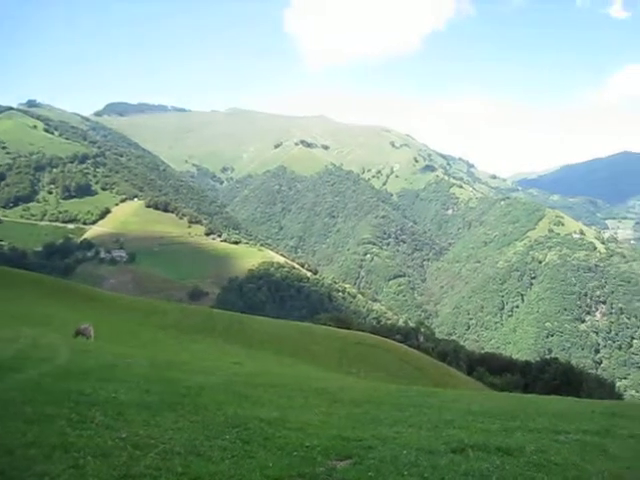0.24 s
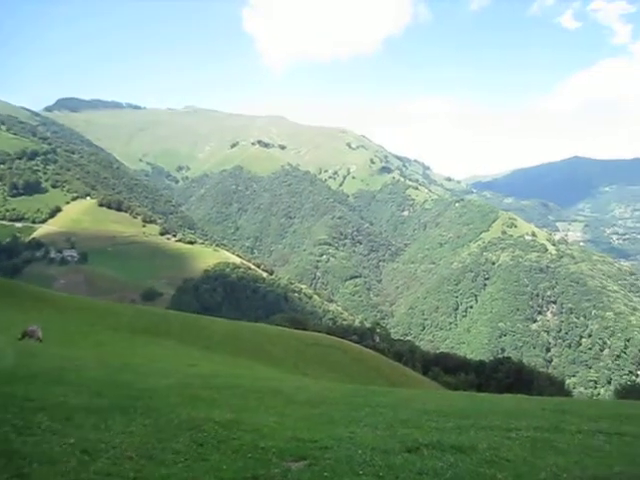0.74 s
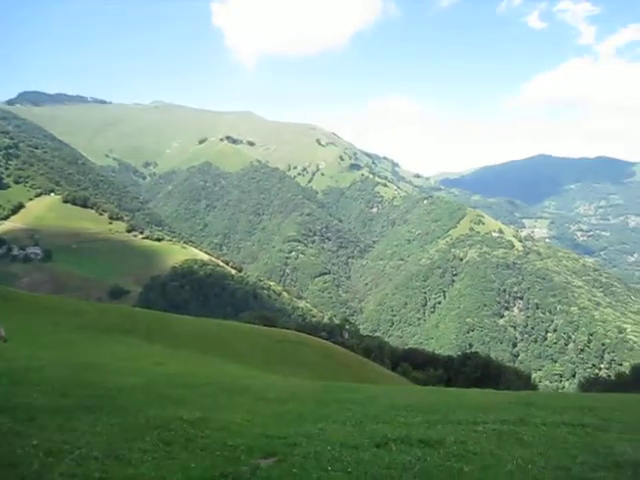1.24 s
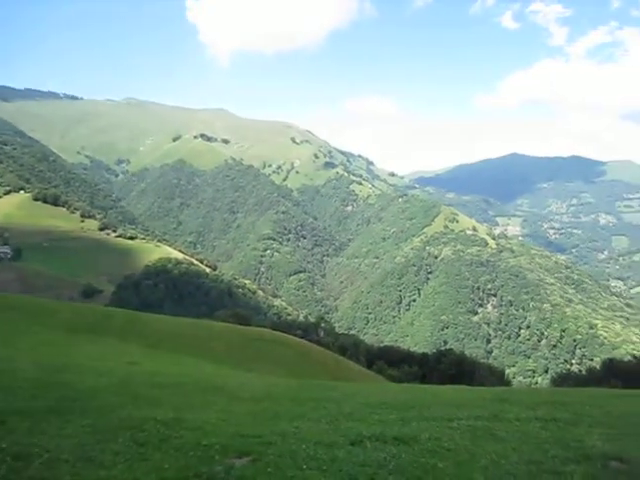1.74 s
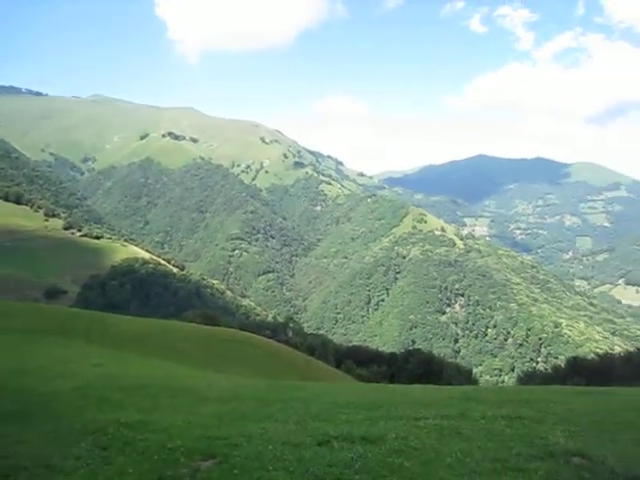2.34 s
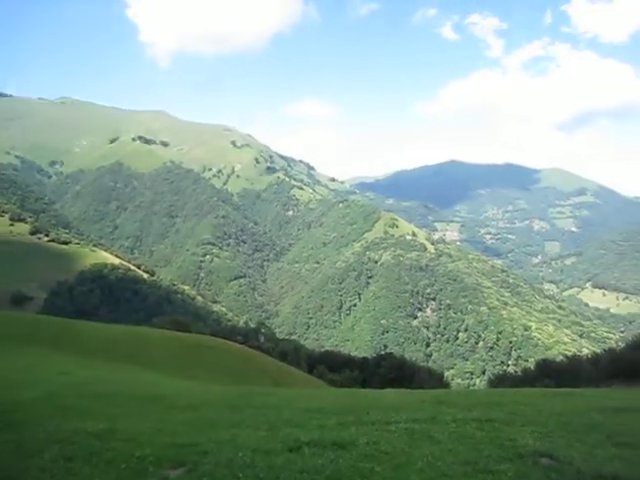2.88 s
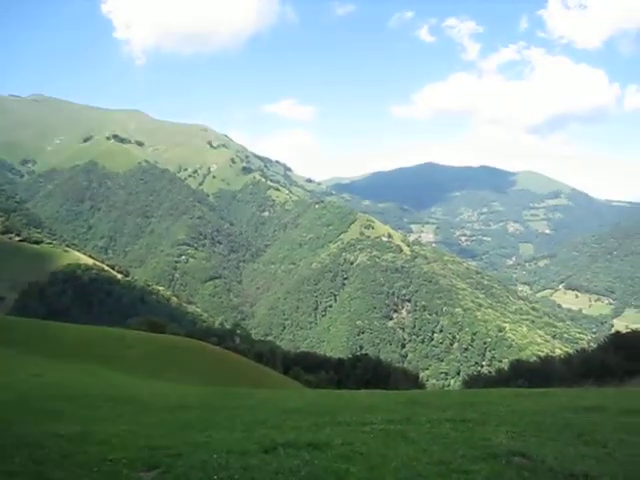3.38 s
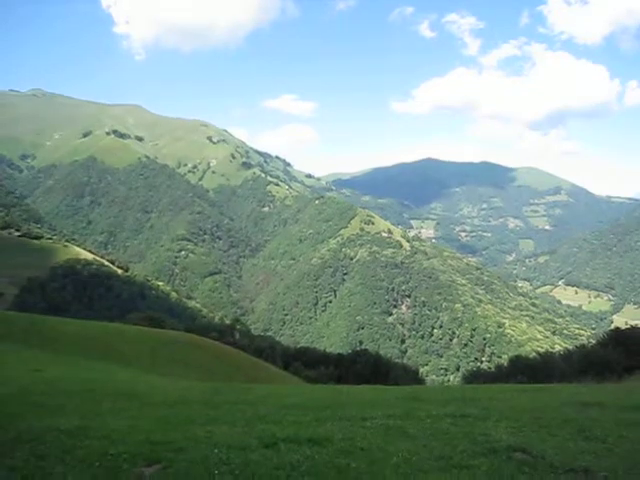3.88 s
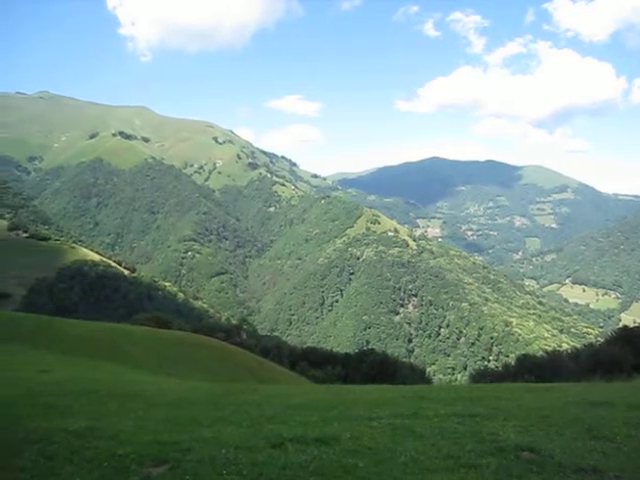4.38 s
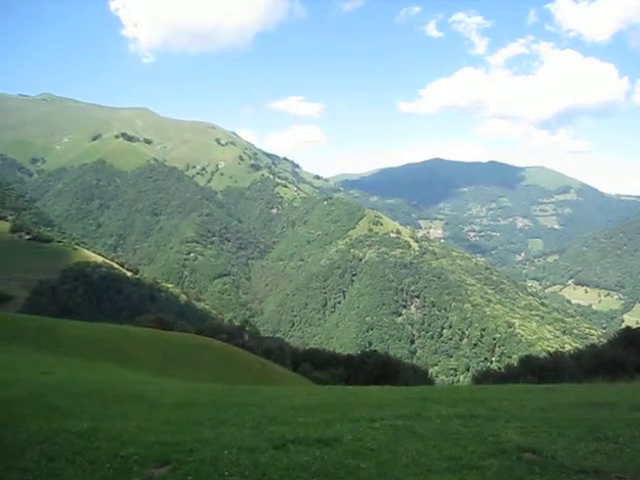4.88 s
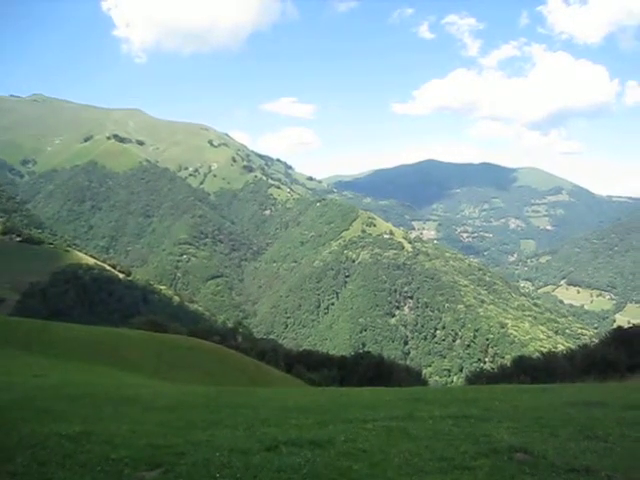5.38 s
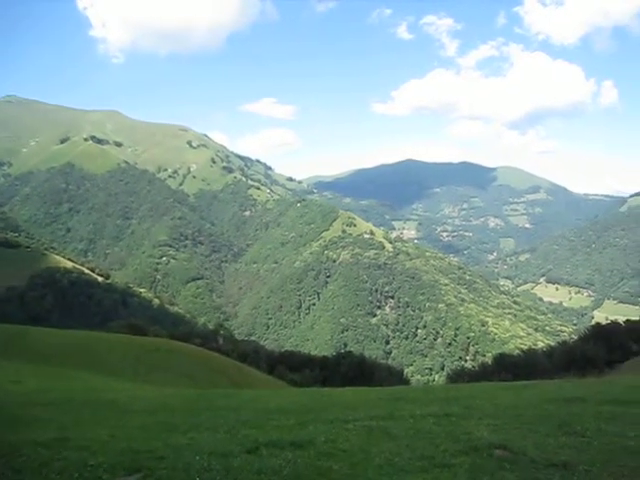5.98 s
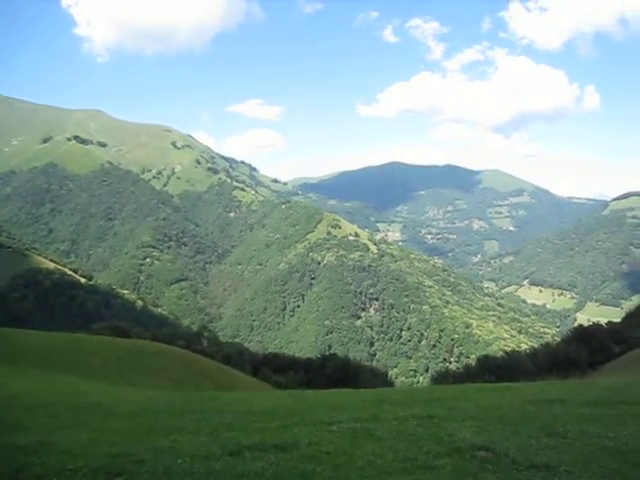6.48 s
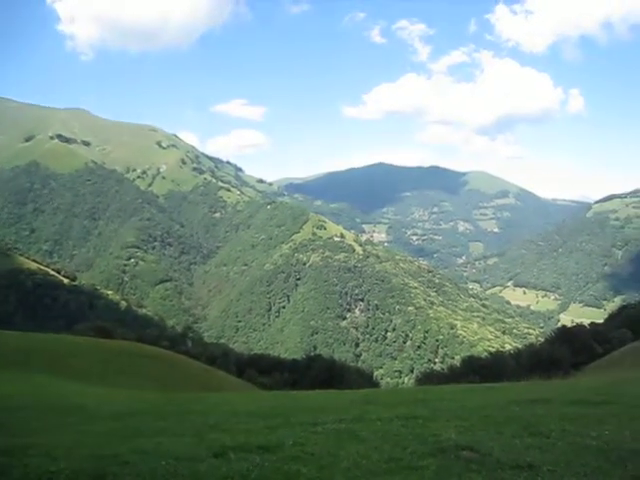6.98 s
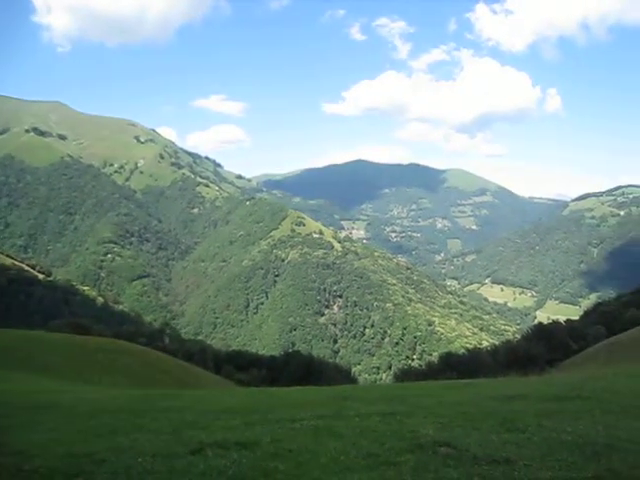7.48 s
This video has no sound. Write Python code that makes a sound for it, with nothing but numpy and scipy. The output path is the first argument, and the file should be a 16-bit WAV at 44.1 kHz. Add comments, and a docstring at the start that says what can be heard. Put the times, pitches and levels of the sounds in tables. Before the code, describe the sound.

An open mountain pasture with faint steady hiss and low lumpy wind rumble. From 0 s several cowbells ring irregularly: a thin bright bell around 2 to 4 kHz whose high partial sings, swells and wavers, a busier dry clanking bell, and a sparser tinny one. The first second is dense and loud, with a wind buffet near 0.9 s; the bells thin out and soften from 1.2 to 3.4 s. A hollow wooden knock with a short rattle lands at 3.6 s. Tiny descending bird chirps begin around 4 s. From 4.6 to 5.2 s a strong gust flutters and pops hard against the microphone. Bright ringing returns from 5.4 to 6.3 s, with high bird trills at 5.15 and 5.8 s and another gust at 6 s. The lowest bell clonks strongly at 6.3, 6.7 and 7.1 s, with a dry scuff at 6.6 s. Bells and light wind pops continue to the end, around 7.7 s, with only a short diffuse echo.

```python
"""Four sheet-metal cowbells clank at their own pitches on an open mountain slope: each blow rings sine modes anew.
The bright bell's strongest partial sings on, swelling and sinking as the bell turns; a wooden knock is damped
sines with a noisy rattle, a scuff is fading noise, and a diffuse noise tail echoes them and the bell blows.
Two small birds trill in gliding sines; gusts buffet and pop the microphone with noise and pressure bumps;
the meadow hisses faintly as coloured noise."""
import sys
import numpy as np
from scipy import signal
from scipy.fft import rfft, irfft, next_fast_len
from scipy.io import wavfile
from scipy.ndimage import uniform_filter1d, map_coordinates

SR = 44100
rng = np.random.default_rng(int(sys.argv[2]) if len(sys.argv) > 2 else 0)


def digitize_waveform(pressure):
    """Quantize a signal to 16-bit integers and store it at the path in sys.argv[1].

    Rows of a 2-D input are taken as channels; values are limited to [-1, 1].
    """
    field = np.atleast_2d(pressure).T
    bounded = np.clip(field, -1, 1)
    quanta = np.round(bounded * 32767).astype(np.int16)
    wavfile.write(sys.argv[1], SR, quanta)


N = 340893


def amp(db):
    """Turn decibels into a linear factor."""
    return 10 ** (np.asarray(db) / 20)


def unit(x):
    """Scale a signal to an rms of 1."""
    return x / np.sqrt(np.mean(x ** 2) + 1e-20)


def wobble(rate):
    """A smooth random curve with rate knots a second."""
    knots = rng.standard_normal(int(N * rate / SR) + 4)
    return map_coordinates(knots, [np.arange(N) * rate / SR])


def filtered(x, response):
    """Multiply the spectrum of x by a complex response of frequency."""
    m = next_fast_len(N + SR // 2)
    return irfft(rfft(x, m) * response(np.fft.rfftfreq(m, 1 / SR)), m)[..., :N]


def coloured(spectrum):
    """Noise of rms 1 shaped by rows of frequency in Hz and relative density in dB."""
    f, db = np.transpose(spectrum)

    def response(hz):
        return amp(np.interp(np.log(hz + 1), np.log(f + 1), db, right=-120))

    return unit(filtered(rng.standard_normal(N), response))


def bell(families, voicing, blows, crack_db):
    """The clapper stops the old ringing and starts each mode family anew; the contact itself cracks."""
    sway_depth_db = 1.6
    scatter_depth_db = 4.5  # how far one blow favours a mode over the first of its family
    blows, voicing = np.array(blows), np.array(voicing)
    strength_db, landing = blows[:, 1:2], blows[:, 2:]
    levels = strength_db + voicing[:, 0] + landing @ voicing[:, 1:].T  # one row a blow, one column a family

    t = np.arange(N) / SR
    last = np.searchsorted(blows[:, 0], t, side="right") - 1
    since = np.where(last >= 0, t - blows[last, 0], N)  # a huge age keeps the bell silent before its first blow
    contact = coloured([(600, -44), (2500, 0.0), (7000, -7), (16000, -20)])
    out = amp(levels[last, -1] + crack_db - 60 * since / .025) * contact

    # a thicket of weak high modes joins the top family
    thicket = [(hz, -hz / 600) for hz in 6500 + 8000 * rng.random(size=20) ** 2.0]
    top_t60, top_modes = families[-1]
    families = families[:-1] + [(top_t60, top_modes + thicket)]
    for k, (t60, modes) in enumerate(families):
        first_hz = modes[0][0]
        # each family flickers as the neck turns the bell, the damped ones with more of the fast flicker
        sway_db = sway_depth_db * (wobble(9) + wobble(45) * np.minimum(.5 / t60, 2))
        for hz, db in modes:
            chance = rng.standard_normal(size=(len(blows), 2))
            # modes far from the family's first vary more from blow to blow
            spread_db = 2.0 + scatter_depth_db * (hz != first_hz) + 7 * abs(np.log(hz / first_hz))
            scatter_db = spread_db * np.tanh(chance[last, 0])
            fade_db = -60 * since / t60 * hz / first_hz  # higher modes die sooner
            level_db = levels[last, k] + db + scatter_db + fade_db + sway_db
            size = uniform_filter1d(amp(level_db), size=24)
            out += size * np.sin(2 * np.pi * hz * since + 10 * chance[last, 1])
    return out


def bright_bell():
    """A thin, long-ringing bell whose lightly damped modes shine high up."""
    # Mode families that one blow excites together. Each row: t60 of the first mode in seconds,
    # then its modes as pairs of frequency in Hz and relative level in dB.
    mode_families = [(4, [(2116, 0)]), (2.4, [(4166, 2), (4157, -11)]), (1.19, [(4861, 2), (4791, -3),
                     (4823, -2)]), (1.1, [(6731, 2)]), (1.2, [(5998, 0)]), (0.4, [(8920, 11), (9695, 2),
                     (10191, -4), (10444, 5), (11396, 3), (11900, -3), (12166, -2), (14150, -7)])]
    # How each family answers a blow. Each row: gain over the blow's strength in dB,
    # tilt in dB per unit of landing height, tilt in dB per unit of landing side.
    family_voicing = [(-4, -5.5, 8.5), (9, -1, -7), (5.5, -3, -2), (4, -7.5, -4.5), (0.6, 15.5, 0),
                      (-8.5, -3.3, -2)]
    # Clapper blows. Each row: start in seconds, strength in dB before the voicing,
    # landing height on the wall and landing side (no unit, roughly -1 to 1).
    clapper_blows = [(0, -48, -0.13, 0.031), (0.088, -41.5, 0.068, 0.36), (0.364, -41.5, 0.17, -0.36),
                     (0.434, -44, 0.16, -0.23), (0.817, -51.5, -0.73, -0.14), (1.263, -50, -0.65, 0.46),
                     (1.579, -52, -0.39, -0.42), (1.73, -44, -1.1, 0.39), (2.171, -46.5, -0.76, 0.26),
                     (2.598, -53.5, -0.37, 0.24), (2.817, -48, 0.13, 0.04), (2.868, -46, 0.2, -0.3),
                     (3.036, -50, 0.45, -1.24), (3.237, -52, 0.14, 0.12), (3.651, -52.5, -0.21, -0.012),
                     (4.019, -47.5, -0.023, -0.1), (4.185, -47.5, 0.12, -0.16), (4.35, -46.5, 0.31, -0.78),
                     (4.505, -48, 0.13, 0.32), (4.668, -55, -0.29, 0.58), (5.176, -48.5, -0.092, 0.72),
                     (5.378, -54, 0.27, -0.28), (5.571, -44, 0.064, 0.3), (5.707, -42, -0.16, 0.45),
                     (5.993, -44.5, 0.23, 0.83), (6.121, -44, 0.05, 1), (6.26, -47, -0.19, 0.55),
                     (6.541, -54, 0.15, -0.59), (7.318, -52.5, 0.19, 1.0), (7.714, -48.0, 0.41, 0.64)]
    return bell(mode_families, family_voicing, clapper_blows, crack_db=19)


def clanking_bell():
    """A busy bell with a lower, more heavily damped body that clanks."""
    # Each row: t60 of the family's first mode in seconds, pairs of frequency in Hz and relative level in dB.
    mode_families = [(0.18, [(964, -3), (991, -2)]), (0.51, [(2519, 10), (2590, -1)]),
                     (0.55, [(4243, 5.8)]), (0.87, [(4080, 6.5), (2096, -4.5)]), (0.17, [(7190, 7),
                     (5844, -1), (8650, 1), (9240, 0.5), (9860, -1.5)])]
    # Each row: family gain in dB, tilt in dB per unit of landing height, tilt in dB per unit of landing side.
    family_voicing = [(8, -8, 5.5), (-1, 6, -1.5), (-2, 12.5, -2.5), (-1.0, -6, -8.5), (0, 1.5, 4)]
    # Each row: start in seconds, strength in dB before the voicing, landing height and side (no unit).
    clapper_blows = [(0.163, -48.5, -0.52, 0.12), (0.431, -40, -0.23, -0.052), (0.472, -41.5, 0.48, -1.1),
                     (0.502, -46, 0.93, 0.044), (0.723, -46, 0.49, -0.096), (0.926, -48.5, -0.07, 0.045),
                     (1.026, -50.4, -0.12, -0.56), (1.221, -50.5, 0.26, -0.7), (1.49, -56.5, 0.23, -0.09),
                     (1.732, -51.5, 0.23, -0.16), (1.825, -50.9, 0.34, -0.03),
                     (1.927, -53.5, -0.16, -0.035), (2.575, -49, -0.15, 0.41), (2.888, -52.5, -0.71, 0.4),
                     (3.04, -52.5, -0.041, 0.05), (3.157, -53, -0.6, -0.65), (3.534, -45, 0.16, 0.24),
                     (3.78, -56, 0.012, 0.82), (3.874, -45, 0.84, -0.51), (4.217, -46.5, 0.28, 0.27),
                     (4.26, -51, 0.16, 0.37), (4.627, -44.5, -0.056, 0.98), (4.999, -41, 0.55, 1.0),
                     (5.069, -47.5, -0.15, -0.053), (5.287, -56.5, -0.037, -0.4),
                     (5.379, -48.5, 0.34, 0.55), (5.458, -46.5, 0.63, 0.066), (5.788, -47.5, -0.092, -0.33),
                     (6.612, -46.5, -0.28, 0.46), (6.92, -48, 0.076, -0.22), (7.003, -52, 0.2, -0.68),
                     (7.235, -42, -0.38, -0.5), (7.414, -50.4, 0.44, -0.29), (7.677, -46, -0.15, 0.22)]
    return bell(mode_families, family_voicing, clapper_blows, crack_db=5.2)


def tin_bell():
    """A sparser, tinny bell with two families of damped modes."""
    # Each row: t60 of the family's first mode in seconds, pairs of frequency in Hz and relative level in dB.
    mode_families = [(.2, [(1040, 0)]), (.55, [(2665, 6), (3801, -1.5), (5184, 1.5), (5475, -7.5)])]
    # Each row: family gain in dB, tilt in dB per unit of landing height.
    family_voicing = [(3.5, -2), (0, 7)]
    # Each row: start in seconds, strength in dB before the voicing, landing height (no unit).
    clapper_blows = [(0.313, -34, -0.21), (1.094, -36, -1.56), (1.55, -57, 0.5), (2.279, -48.5, 0.64),
                     (2.721, -52, 0.62), (3.441, -41.5, -0.33), (4.125, -39.5, -0.43), (4.936, -45, 0.15),
                     (5.721, -49.5, 0.13), (6.125, -47.5, 0.17), (7.359, -49.5, -0.17)]
    return bell(mode_families, family_voicing, clapper_blows, crack_db=0.1)


def deep_bell():
    """The lowest bell, struck only a few times."""
    # Each row: t60 of the family's first mode in seconds, pairs of frequency in Hz and relative level in dB.
    mode_families = [(0.32, [(727, 0)]), (1.1, [(1830, 4), (2690, -3), (3903, -11)]), (0.18, [(5523, -3),
                     (8053, -2), (8667, -4)])]
    # Each row: family gain in dB, tilt in dB per unit of landing height.
    family_voicing = [(2.5, -19), (-9, 1), (-7, -36)]
    # Each row: start in seconds, strength in dB before the voicing, landing height (no unit).
    clapper_blows = [(0.277, -41, -0.0014), (2.19, -40, 1), (6.278, -31.5, -0.03), (6.721, -31, 0.045),
                     (7.069, -27.5, -0.023)]
    return bell(mode_families, family_voicing, clapper_blows, crack_db=10.0)


def singing_partial():
    """The turning bright bell sweeps its lobes past the microphone, each fading after its crest; the pitch wavers."""
    # Lobes of the singing partial. Each row: quietest moment in seconds, loudest moment in seconds,
    # rms level at the crest in dB.
    swing_lobes = [(-0.3, 0.167, -34), (0.335, 0.676, -29), (0.84, 0.84, -37), (1.13, 1.36, -40),
                   (1.712, 2.27, -40), (2.8, 2.826, -40.5), (2.875, 3.036, -40), (3.226, 3.26, -38.5),
                   (3.547, 3.674, -43.5), (4.01, 4.03, -44), (4.175, 4.2, -46.5), (4.34, 4.358, -42.5),
                   (4.516, 4.575, -49), (4.606, 4.705, -43.5), (4.95, 5.26, -51.5), (5.386, 5.437, -34),
                   (5.445, 5.501, -36.5), (5.568, 5.666, -33), (5.762, 5.812, -33.5), (5.85, 6.012, -28.5),
                   (6.177, 6.252, -39.5), (6.274, 6.342, -37), (6.416, 6.478, -43), (6.535, 6.577, -33),
                   (6.667, 6.77, -40), (6.837, 6.91, -41.5), (7.036, 7.097, -35.5), (7.13, 7.238, -36),
                   (7.657, 7.7, -45.5)]
    singing_hz, fade_db_per_s = 3351.4, 20
    lobe_sharpness, null_db, last_null_s = 0.72, -17, 8.5
    silent, loudest, db = np.transpose(swing_lobes)
    t = np.arange(N) / SR

    # nulls and crests alternate, a quarter turn of the sine apart
    marks = np.append(np.column_stack([silent, loudest]).ravel(), last_null_s)
    lobe = np.sin(np.pi / 2 * np.interp(t, marks, np.arange(len(marks))))
    facing = np.sign(lobe) * np.abs(lobe) ** lobe_sharpness

    now = np.searchsorted(silent, t) - 1
    fade_db = fade_db_per_s * np.maximum(t - loudest[now], 0)
    level_db = uniform_filter1d(db[now] - fade_db, size=400)
    phase = 2 * np.pi * np.cumsum(singing_hz * (1 + 0.00081 * wobble(4.3))) / SR
    # a weak quadrature part keeps the nulls from full silence
    tone = facing * np.sin(phase) + amp(null_db) * np.cos(phase)
    return np.sqrt(2) * amp(level_db) * tone


def knock():
    """A hollow wooden blow: heavily damped modes with a short noisy rattle after it."""
    # Modes of the wood. Each row: frequency in Hz, relative level in dB, t60 in seconds.
    wood_modes = [(535, 3, 0.11), (1213, -7, 0.12), (1720, -7, 0.04)]
    start_s, level_db = 3.644, -19
    t = np.arange(SR // 2) / SR
    ring = sum(amp(db - 60 * t / t60) * np.sin(2 * np.pi * hz * t) for hz, db, t60 in wood_modes)
    grain = coloured([(300, -9), (600, -2.0), (1500, -10), (3000, -15), (4000, -46)])[:len(t)]
    rattle = grain * amp(-6.0 - 60 * t / 0.27)
    attack = 1 - np.exp(-t / 0.0015)
    out = np.zeros(N)
    out[round(start_s * SR):][:len(t)] = amp(level_db) * (ring + rattle) * attack
    return out


def scuff():
    """A short dry scuff, perhaps a hoof in the grass: noise that starts at once and fades."""
    start_s, onset_db, t60_s = 6.6, -36.5, 0.41
    since = np.arange(N) / SR - start_s
    fade = amp(onset_db - 60 * np.abs(since) / t60_s) * (since > 0)
    return fade * coloured([(500, -8.0), (2000, -9), (9000, -25)])


def slope_echo(x):
    """A short diffuse return from the ground and the herd: a decaying noise tail of unit energy."""
    t = np.arange(SR // 2) / SR
    tail = rng.standard_normal(len(t)) * amp(-60 * t / 0.14)
    return signal.fftconvolve(x, tail / np.linalg.norm(tail))[:N]


def flicking_bird():
    """A held note flicks upward about 30 times a second, dipping in level at each flick."""
    # Held notes. Each row: start in seconds, end in seconds, peak level between flicks in dB.
    held_notes = [(5.148, 5.214, -39), (5.785, 6.017, -39)]
    flick_period_s, note_hz, flick_hz, flick_dip_db = .0335, 6320, 170, 3.6
    t = np.arange(N) / SR
    out = np.zeros(N)
    for start, end, db in held_notes:
        beat = ((t - start) / flick_period_s) % 1
        gate = uniform_filter1d(1. * ((t > start) & (t < end)), size=200)
        flick = np.exp(-((beat - .93) / 0.18) ** 2)
        phase = 2 * np.pi * np.cumsum(note_hz + flick_hz * flick) / SR
        out += gate * amp(db - flick_dip_db * flick) * np.sin(phase)
    return out


def chirping_bird():
    """Chirps in threes, each a swelling and sinking tone that glides down."""
    # Phrases of three chirps. Each row: middle of the first chirp in seconds, peak level in dB.
    trill_phrases = [(4.07, -52), (4.425, -61), (4.782, -46.5), (5.133, -46), (5.462, -48), (5.79, -51)]
    gap_s, width_s, middle_hz, fall_hz_per_s = .0375, 0.019, 4960, 30000
    t = np.arange(N) / SR
    out = np.zeros(N)
    for first, db in trill_phrases:
        for k in range(3):
            u = t - first - k * gap_s
            swell = np.exp(-(u / width_s) ** 2)
            out += amp(db) * swell * np.sin(2 * np.pi * (middle_hz - fall_hz_per_s * u / 2) * u)
    return out


def puffs(times, sizes, widths):
    """Pressure bumps on the diaphragm; its vent turns each into a push and a slower swing back."""
    vent_hz = 110
    steps = np.arange(-300, 301)  # samples around each bump
    bumps = sizes[:, None] * np.exp(-(steps / SR / widths[:, None]) ** 2)
    spots = np.round(times * SR).astype(int)[:, None] + steps
    inside = (spots >= 0) & (spots < N)
    pressure = np.bincount(spots[inside], bumps[inside], N)
    return filtered(pressure, lambda hz: (1j * hz / (vent_hz + 1j * hz)) ** 2)


def wind():
    """Eddies at the microphone port: a lumpy rumble, a ragged flutter, puffs that sharpen in gusts, and hard pops."""
    # Course of the wind. Each row: time in seconds, level in dB before it is shared among the layers.
    gust_course = [(0.0, -37.5), (0.77, -36), (0.88, -22.5), (1.29, -37), (1.33, -30.5), (1.42, -36),
                   (4.09, -35.5), (4.39, -45.5), (4.585, -27.5), (4.64, -20.5), (5.17, -21.5), (5.19, -30),
                   (5.9, -52), (6.0, -25.5), (6.39, -65), (6.44, -41.5), (6.76, -48), (6.91, -38),
                   (7.73, -37.5)]
    # The hardest buffets. Each row: time in seconds, strength in dB before the lift below.
    hard_pops = [(0.825, -20), (0.878, -10.5), (0.925, -14.5), (1.115, -17.5), (2.013, -19.5),
                 (2.488, -19.5), (4.629, -23.5), (4.664, -7), (4.744, -6.5), (4.824, -10), (4.863, -10.5),
                 (4.897, -4.5), (4.932, -8), (5.012, -12.5), (5.075, -6), (5.112, -8.5), (5.154, -10),
                 (5.327, -14.5), (5.36, -12), (5.552, -17.5), (5.98, -14), (6.062, -15), (6.441, -14.5),
                 (6.923, -17.5), (7.091, -13.5), (7.276, -18.5), (7.392, -16), (7.449, -18.5), (7.475, -16)]
    # Colour of the rumble. Each row: frequency in Hz, relative density in dB per Hz.
    rumble_colour = [(15, -10), (40, -1.5), (110, -0.5), (250, -12), (1200, -57)]
    gust_s, gust_point_db = np.transpose(gust_course)
    gust_db = np.interp(np.arange(N) / SR, gust_s, gust_point_db)
    strength = np.clip((gust_db + 40.0) / 22, 0, 1)

    lumps = np.tanh(wobble(38))
    rumble = unit(amp(7.5 * wobble(9.2) + 5.3 * lumps) * coloured(rumble_colour))
    flutter_noise = coloured([(100, -6.5), (250, 3), (600, -9.0), (3500, -67.0)])
    flutter = unit(amp(6.4 * lumps + 7.9 * wobble(90)) * flutter_noise)

    # 900 random puffs, shorter in strong wind, most of them pushing inward
    draw = rng.random(size=(900, 4))
    at = (draw[:, 0] * (N - 1)).astype(int)
    widths = np.clip(.003 - 0.0023 * strength[at], 2e-4, .004) * (.5 + draw[:, 1])
    puff_db = np.minimum(-6 * np.log(draw[:, 2]), 8) + 6.7 * lumps[at]
    sign = np.where(draw[:, 3] < .7, 1, -1)
    eddies = unit(puffs(at / SR, amp(puff_db) * sign, widths))

    # harder pops are narrower
    pop_s, pop_db = np.transpose(hard_pops)
    pop_widths = np.clip(0.0015 * amp(-.6 * (pop_db + 25.5)), 1.2e-4, .003)
    pops = puffs(pop_s + 0.00454, amp(pop_db + 4.5), pop_widths)

    # a stronger gust moves its energy from the rumble up into the flutter
    layers = amp(-10.3 * strength) * rumble + amp(-5.0) * eddies + amp(-16 + 10 * strength) * flutter
    return amp(gust_db) * layers + pops


def meadow():
    """A faint broadband hiss whose level drifts slowly."""
    # Colour of the hiss. Each row: frequency in Hz, relative density in dB per Hz.
    hiss_colour = [(200, 1.5), (1000, 3.5), (3000, -2), (7000, -5), (11000, -11), (16000, -22)]
    breeze_db = 0.8 * wobble(2.75)
    return amp(-47.0 + breeze_db) * coloured(hiss_colour)


def scene():
    """Sum the herd with its echo, the singing partial, the birds, the wind and the meadow."""
    echo_db = -9
    bells = bright_bell() + clanking_bell() + tin_bell() + deep_bell()
    herd = bells + knock() + scuff()
    near = herd + amp(echo_db) * slope_echo(herd) + singing_partial()
    birds = flicking_bird() + chirping_bird()
    return (near + birds + wind() + meadow())[None]


def record(dry):
    """A sharp band limit removes everything from the top frequency up."""
    top_hz = 15870
    return filtered(dry, lambda hz: hz < top_hz)


dry = scene()
out = record(dry)
digitize_waveform(out)
```